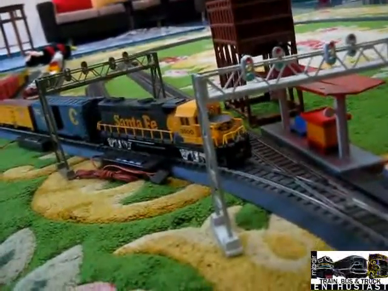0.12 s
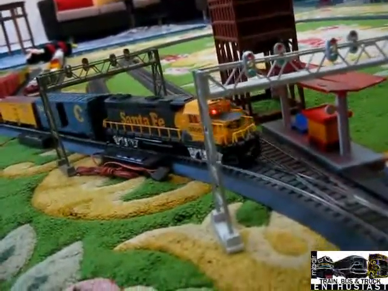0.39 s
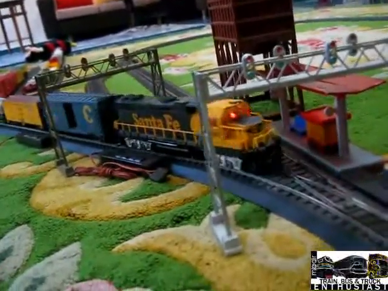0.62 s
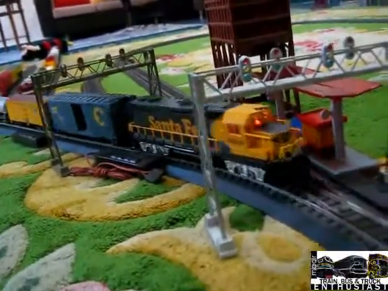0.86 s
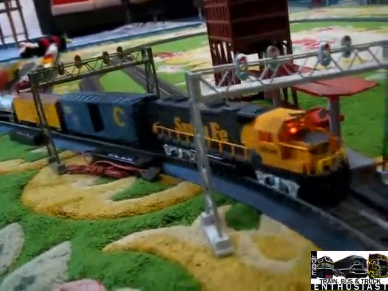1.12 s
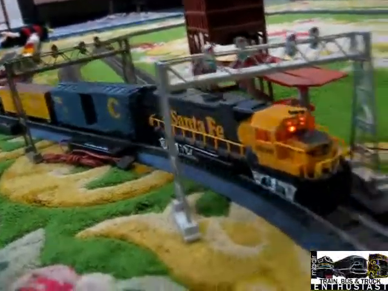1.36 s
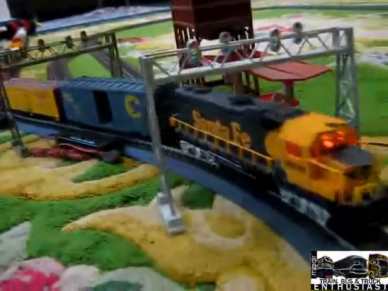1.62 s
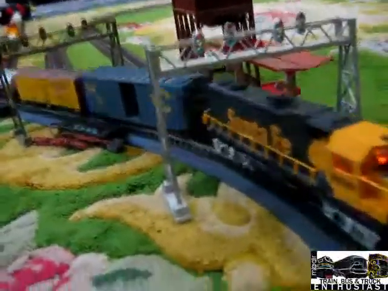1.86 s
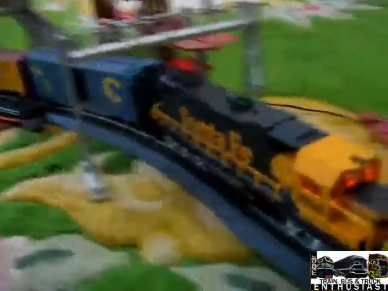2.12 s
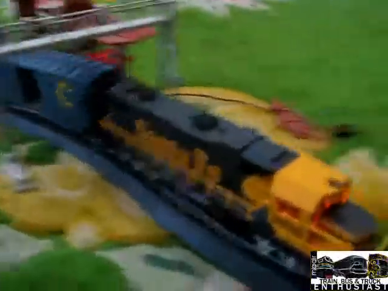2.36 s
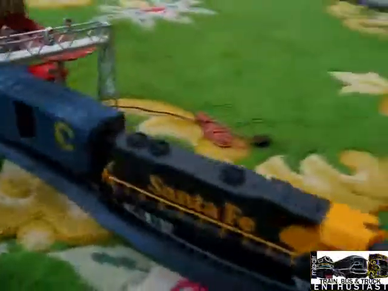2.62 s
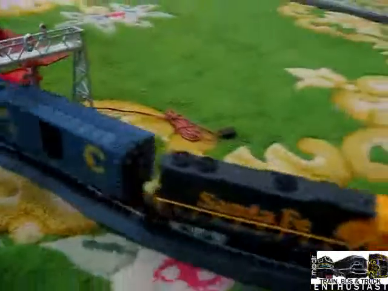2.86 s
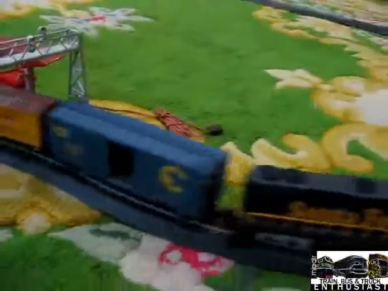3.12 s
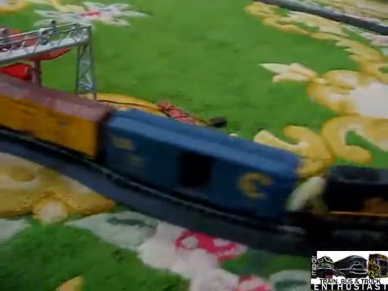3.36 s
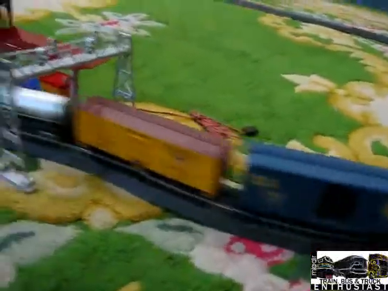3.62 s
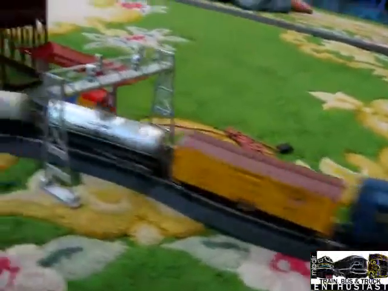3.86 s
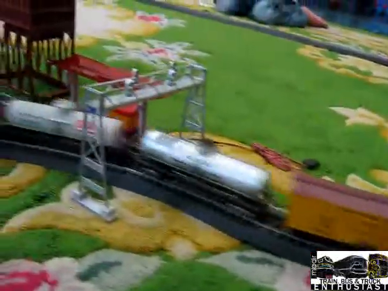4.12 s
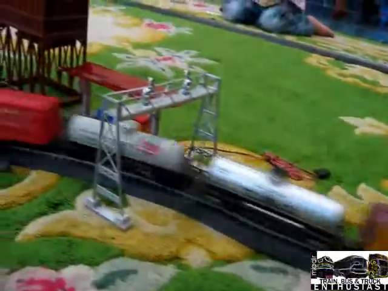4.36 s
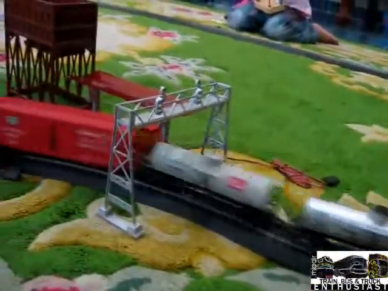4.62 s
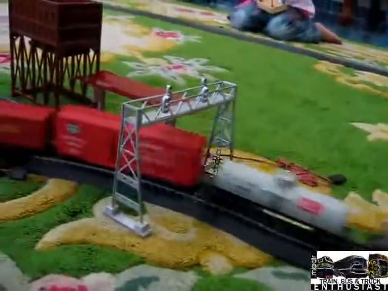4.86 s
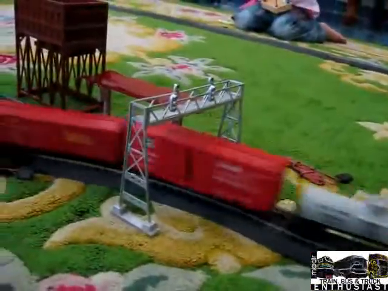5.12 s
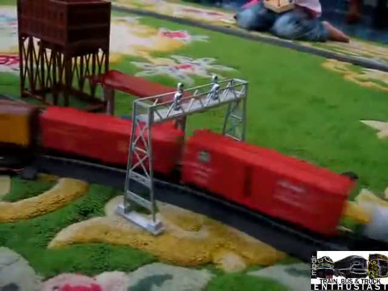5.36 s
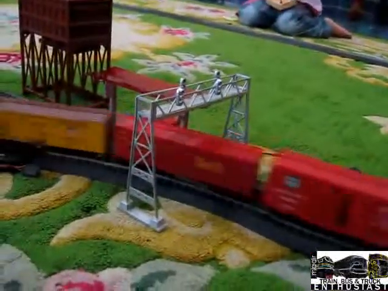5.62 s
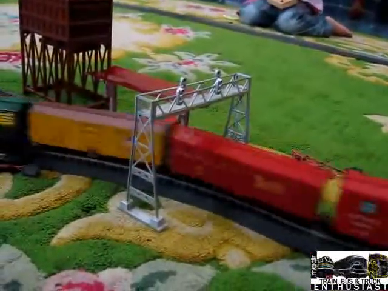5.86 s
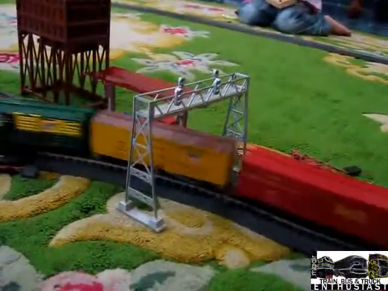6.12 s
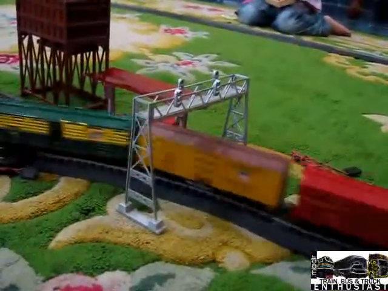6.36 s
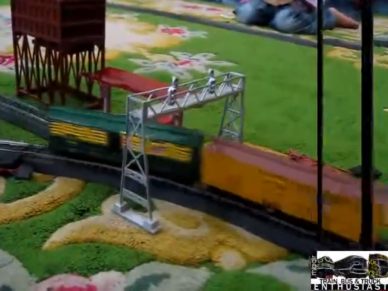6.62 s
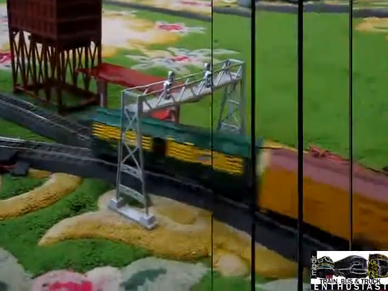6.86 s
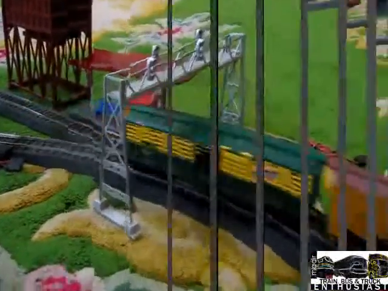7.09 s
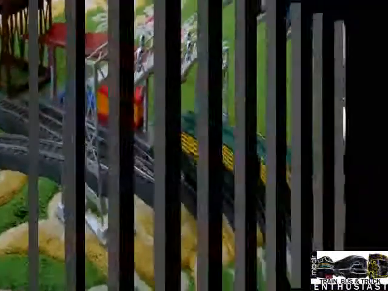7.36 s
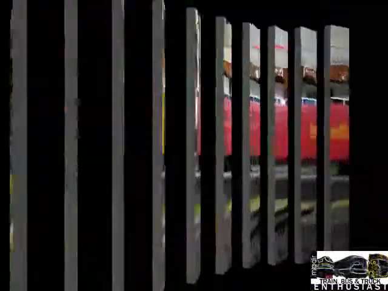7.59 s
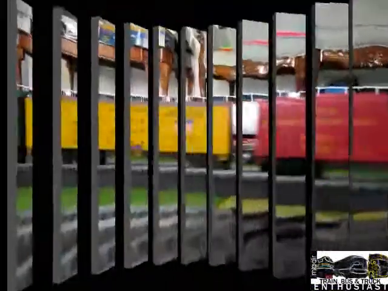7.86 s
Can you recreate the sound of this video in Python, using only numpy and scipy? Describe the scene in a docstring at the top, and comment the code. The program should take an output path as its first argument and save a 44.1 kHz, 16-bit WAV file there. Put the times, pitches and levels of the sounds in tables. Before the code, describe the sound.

Indoors, a quiet room hum comes first, with tiny rail ticks. A model locomotive starts, its thin gear whine climbing quickly while gritty hiss and electric fizz swell to a peak around two seconds. The whine wavers and sags as the wagons roll by with irregular clicks and dull little knocks. Near the end another train's whine and hiss swell in. Close, mono microphone.

```python
"""Over a steady room hum, wagons roll in quietly and tick over rail joints as a model locomotive pulls away.
Hiss and fizz (gritty shaped noise) swell, pulsing with the shafts; bands of noise sing for a while.
The gear whine (orders of the tooth mesh) climbs from 750 Hz, then wavers and sags; low knocks (short
decaying sines) make a small creak of the camera near 2.1 s, then dull thumps. Near the end a second
train's whine (upward-bending lines) swells in. All is mono, with a narrow gap near 8 kHz."""
import sys
import numpy as np
from scipy import signal
from scipy.fft import rfft, irfft, next_fast_len
from scipy.io import wavfile
from scipy.ndimage import uniform_filter1d, map_coordinates

SR = 44100
rng = np.random.default_rng(int(sys.argv[2]) if len(sys.argv) > 2 else 0)


def unload_wav(signal):
    """Save mono or channel-first audio to the path in sys.argv[1] as 16-bit WAV at rate SR, clipped to [-1, 1]."""
    wavfile.write(
        sys.argv[1],
        SR,
        np.round(np.clip(np.atleast_2d(signal).T, -1, 1) * 32767).astype(np.int16),
    )


def level_to_linear(level):
    """Convert decibel levels to linear amplitude factors, elementwise."""
    exponent = np.asarray(level, float) / 20
    return 10 ** exponent


N = 351918
HOP = 128  # samples between noise-shaping frames
GAP_HZ = 7875  # centre of the narrow gap in the spectrum

# room and preamplifier noise: f/Hz, relative level/dB
HUM_SPECTRUM = [(15, -30), (25, -12.5), (221, -7.5), (282, -7), (314, -6.5), (360, -7), (400, -9),
                (524, -10), (1080, -19), (1460, -17), (15600, -31)]
# wheels on rails: f/Hz, relative density/dB
ROLL_SPECTRUM = [(250, -51), (420, -9), (715, 2), (850, 0), (1290, 2), (1600, -2.5), (2080, 3),
                 (3520, -120)]
# wheels of the whole train: t/s, level/dB
ROLL_LEVEL = [(0, -55.5), (0.2, -55), (0.42, -51), (0.65, -45.5), (1.64, -44.5), (2.1, -42.5), (2.7, -40.5),
              (3.6, -41), (4.3, -43), (4.7, -41.5), (6.6, -44.5), (7.25, -44), (7.55, -40.5), (7.98, -43.5)]
# resonances of rails, roadbed and wagon shells: f/Hz, width/Hz, lift/dB
TRACK_RESONANCES = [(660, 110, 1.5), (1255, 730, 3), (1950, 410, -1), (2820, 160, 1.5), (3620, 770, 5),
                    (5000, 110, 0)]
# drive passing the microphone: t/s, gear hiss level/dB, brush fizz over hiss/dB, hiss resonance f/Hz
DRIVE_PASS = [(0.0, -61, -12, 3800), (0.2, -51.5, -6.5, 5000), (0.42, -43.5, -2.5, 5900),
              (0.7, -39.5, -2, 5550), (0.95, -37.5, 0.5, 5600), (1.26, -36.5, 2, 6230),
              (1.64, -31.5, -2.5, 5000), (2.09, -30, -7.5, 5110), (2.42, -31.5, -6, 4430),
              (2.69, -31.5, -6, 4964), (3.13, -32, -6, 4300), (3.53, -33, -7, 4113),
              (4.29, -38, -4.5, 4540), (4.75, -38.5, -6.5, 4000), (6.45, -42.5, -3.5, 3900),
              (6.62, -43, -4, 4500), (6.75, -40, -3, 4350), (7.27, -33.5, -4, 3900),
              (7.98, -33.5, -3.5, 3800)]
# gear hiss: f/Hz, relative density/dB
HISS_SPECTRUM = [(940, -46), (1600, 0.5), (2530, 4), (3000, 1.5), (3610, -1.5), (5560, 1.5), (7300, -1),
                 (9490, -23), (16100, -120)]
# brush fizz: f/Hz, relative density/dB
FIZZ_SPECTRUM = [(4940, -75), (8400, -0.5), (11200, -1), (12900, -1.5), (13900, -0.5), (15600, -6)]
# uneven shafts: mesh cycles per turn, depth in hiss (0-1), depth in fizz (0-1)
SHAFTS = [(60, .08, .14), (30, .12, .06), (10, .1, .1)]
# wheels over joints, couplers taking up slack: t/s, burst level before filters/dB, bright part re dull/dB
# (the dull part then gains 5.5 dB and the bright part loses 5 dB)
JOINT_TICKS = [(0.1905, -29.5, 0), (0.2138, -29, 6), (0.235, -29, 0), (0.2664, -34, -2), (0.2954, -30, 15),
               (0.3064, -32, 2), (0.3655, -40, -2), (0.398, -31, -2), (0.8674, -31, -2), (1.3644, -20, -2),
               (1.6797, -17, -2), (2.5477, -18, 0), (3.7562, -18, 1), (3.7809, -14, 0), (4.05, -28, -4),
               (4.1094, -21, -3), (4.1742, -19, -3), (4.331, -14, 4), (4.367, -17.5, 10),
               (4.4935, -19.5, 14), (4.571, -22, 20), (4.9531, -23, 12), (5.092, -19, 2), (5.1482, -14, 13),
               (5.2667, -20, 0), (5.3122, -18, -4), (5.34, -28, 0), (5.462, -19, -2), (5.5062, -18.5, 3),
               (5.5528, -19, 14), (5.7074, -24, -3), (6.3026, -26, -8), (6.3914, -20, -1), (6.7418, -27, 0),
               (7.6849, -19, 0), (7.7114, -15, 0), (7.7614, -25, -2)]
# bands that sing, at a guess resonating shells; the two rows near 3.4-3.7 kHz after 7.6 s are a rough order of
# the second train's whine: start/s, end/s, centre f/Hz, width/Hz, level/dB
SINGING_BANDS = [(0.357, 0.64, 5920, 830, -44), (0.54, 0.73, 332, 38, -54.5),
                 (0.556, 0.716, 5000, 520, -39), (0.724, 1.4, 3900, 379, -42.5),
                 (0.8, 1.4, 11400, 1000, -40), (1.17, 1.51, 6400, 300, -39.5), (1.5, 1.65, 14500, 720, -44),
                 (1.74, 1.9, 4800, 500, -30.5), (1.65, 2.45, 13400, 1400, -38), (1.1, 1.9, 9800, 600, -45),
                 (.9, 1.9, 8700, 900, -45), (1.901, 2.077, 4800, 500, -34), (1.999, 2.2, 172, 156, -53.5),
                 (2.051, 2.35, 5990, 386, -38), (2.38, 2.7, 3500, 310, -40.5), (2.4, 3.1, 14000, 1500, -39),
                 (2.9, 3.4, 13200, 1500, -42), (2.95, 3.6, 3500, 900, -37), (2.52, 2.945, 5700, 258, -39),
                 (3.002, 3.506, 4470, 250, -41.5), (5.651, 6.451, 1308, 80, -55),
                 (7.1, 7.454, 577, 120, -48.5), (4.552, 5.35, 11000, 980, -49),
                 (7.67, 7.86, 3400, 400, -36.5), (7.78, 8.15, 3700, 490, -36.5), (.84, 1.34, 700, 40, -48),
                 (1.45, 1.78, 780, 90, -51)]
# gear train: t/s, mesh f/Hz, base level/dB, strain gain per order above the first/dB
GEAR_MESH = [(0.38, 750, -68, 6.5), (0.49, 962, -49.5, 0.5), (0.6, 1230, -50, 0), (0.71, 1305, -46, -4),
             (0.8, 1273, -53, 3.5), (0.87, 1253, -53, 3.5), (0.93, 1365, -51, 4.5), (0.99, 1409, -48, 4.5),
             (1.11, 1590, -47, 2.5), (1.37, 1682, -49.5, 4), (1.42, 1752, -48, 3.5),
             (1.58, 1866, -47.5, 5.5), (1.78, 1915, -44, -2), (1.86, 1948, -42, 6), (1.9, 1860, -40, -5),
             (1.97, 1885, -41, 1), (2.14, 2047, -41.5, 1), (2.24, 2117, -44, 2.5), (2.39, 2154, -44, -3),
             (2.63, 2393, -40.5, -5), (2.71, 2447, -40.5, -4.5), (2.85, 2442, -43.5, -16),
             (3.1, 2479, -45, -14), (3.47, 2645, -45, -6), (3.88, 2605, -48.5, -3), (4.0, 2560, -55, -2),
             (4.32, 2560, -56, 1), (4.6, 2715, -55, -14), (4.8, 2690, -61, -10), (5.1, 2770, -52, -15),
             (5.5, 2685, -61, -12), (6.0, 2595, -52, -3), (6.6, 2516, -56, -3)]
# mesh orders: multiple of mesh f, roughness (0-1), skirt re line/dB
MESH_ORDERS = [(.5, .6, -5), (1, .14, -12), (2, .25, -7), (3, .3, -6), (4, .4, -4)]
# gain of each mesh order: gain/dB
MESH_ORDER_DB = [-14, -1.5, -7, -10, -9.5]
# locomotive shell resonances: f/Hz, width/Hz, lift/dB
SHELL_RESONANCES = [(800, 230, 15), (1223, 130, 7), (1886, 120, 5), (2490, 330, 5.5), (3800, 450, 6),
                    (4270, 200, 5.5), (5170, 700, 8), (6500, 600, 3.5)]
# orders that ring out briefly: multiple of mesh f, start/s, end/s, lift/dB
RINGING_ORDERS = [(.5, 1.04, 1.3, 8), (1, 0.53, .8, 3), (1, 1.05, 1.47, 2), (1, 1.98, 2.62, 3.5),
                  (1, 3.2, 3.5, 5), (1, 4.95, 5.25, 12.5), (2, 0.493, 0.774, 14), (2, .92, 1.1, 6.5),
                  (2, 1.34, 1.89, 12), (2, 2.08, 2.37, 8.5), (2, 2.56, 2.88, 15.5), (2, 3.62, 4.4, 9.5),
                  (3, .75, .94, 13.5), (3, 1.05, 1.34, 10.5), (3, 1.33, 1.68, 13), (4, 0.7, 0.928, 13),
                  (4, 0.89, 1.46, 10.5)]
# low knocks, a small creak of the camera near 2.1 s, then dull thumps:
# t/s, level before attack and decay/dB, f/Hz
LOW_KNOCKS = [(2.044, -31, 360), (2.076, -28.5, 370.5), (2.119, -32, 368), (2.169, -31.5, 380),
              (3.419, -27.5, 703), (3.551, -24.5, 701), (3.872, -30.5, 653.4), (5.785, -32, 678),
              (7.277, -28, 619.5), (7.493, -21.5, 656), (7.558, -27.5, 632), (7.685, -27, 637),
              (7.752, -25.5, 657), (7.951, -24, 651)]
# whine of the second train: start/s, end/s, start f/Hz, end f/Hz, level at 70 % of the span/dB
SECOND_LINES = [(6.661, 7.64, 4168, 4450, -40), (6.8, 8.1, 1985, 2008, -48), (6.85, 7.5, 1792, 1806, -50),
                (7.68, 8.2, 4680, 4900, -44.5)]


def unit(x):
    """Scale to rms 1."""
    return x / np.sqrt(np.mean(x ** 2) + 1e-20)


def along(points, hz):
    """Interpolate (f/Hz, value) points on a log frequency axis."""
    f, v = np.transpose(points)
    return np.interp(np.log(hz + 1), np.log(f + 1), v)


def curves(rows):
    """One value per sample for each column after the time."""
    s, *columns = np.transpose(rows)
    return [np.interp(np.arange(N) / SR, s, c) for c in columns]


def wobble(knots_per_s):
    """Smooth random curve through normally distributed knots."""
    knots = rng.standard_normal(int(N * knots_per_s / SR) + 4)
    return map_coordinates(knots, [np.arange(N) * knots_per_s / SR])


def swell(start_s, end_s, edge):
    """Progress 0-1 through a span, and a level that fades over the share edge at each side."""
    u = np.clip((np.arange(N) / SR - start_s) / (end_s - start_s), 0, 1)
    return u, np.sin(np.pi / 2 * np.clip(np.minimum(u, 1 - u) / edge, 0, 1)) ** 2


def filtered(x, response):
    """Apply a zero-phase response, given as a function of frequency."""
    m = next_fast_len(N + 8192)
    return irfft(rfft(x, m) * response(np.fft.rfftfreq(m, 1 / SR)), m)[:N]


def resonances_db(rows, hz):
    """Sum of resonance lifts at a frequency."""
    return sum(db / (1 + (2 * (hz - centre) / width) ** 2) for centre, width, db in rows)


def rattle(spectrum, grit_db, patchy_db, peak_hz, width, lift_db):
    """Gritty, patchy noise levelled to rms 1 over 0.2 s, with one resonance (width in log frequency)."""
    grit = rng.standard_normal(N) * level_to_linear(grit_db)
    hz, t, z = signal.stft(grit, SR, nperseg=4 * HOP, noverlap=3 * HOP)
    patches = uniform_filter1d(rng.standard_normal(z.shape), size=8, axis=0)
    patches = uniform_filter1d(patches, size=15, axis=1)
    # narrow resonances that linger
    streaks = uniform_filter1d(rng.standard_normal(z.shape), size=120, axis=1)
    frame = np.minimum(np.arange(len(t)) * HOP, N - 1)
    offset = np.log((hz[:, None] + 1) / peak_hz[frame]) / width
    peak_db = lift_db[frame] * np.exp(-offset ** 2)
    z = z * level_to_linear(patchy_db * unit(patches) + 2.16 * unit(streaks) + peak_db)
    x = signal.istft(z, SR, nperseg=4 * HOP, noverlap=3 * HOP)[1][:N]
    x = filtered(x, lambda f: level_to_linear(along(spectrum, f) + resonances_db(TRACK_RESONANCES, f)))
    power = uniform_filter1d(uniform_filter1d(x * x, size=SR // 5), size=SR // 5)
    return x / np.sqrt(np.abs(power) + 1e-20)


def tone(cycles, rough, spread_hz, skirt_hz, skirt_db):
    """Line of rms 1, a sine blended with narrow noise, plus a wider skirt of noisy sidebands."""
    rough = np.clip(rough, 0, 1)

    def fuzz(width_hz):
        return unit(wobble(width_hz)) + 1j * unit(wobble(width_hz))

    swing = np.sqrt(2 - 2 * rough) + np.sqrt(rough) * fuzz(spread_hz)
    swing = swing + level_to_linear(skirt_db) * fuzz(skirt_hz)
    return np.real(swing * np.exp(2j * np.pi * cycles))


def mesh_cycles():
    """Tooth-mesh cycle count: the mesh frequency, slightly unsteady, summed over time."""
    mesh_hz = curves(GEAR_MESH)[0]
    return np.cumsum(mesh_hz * (1 + 0.00198 * wobble(25))) / SR


def shaft_turns(cycles):
    """One cosine per shaft, a cycle each turn, with wandering phase."""
    return [np.cos(2 * np.pi * cycles / n + 1.66 * wobble(8.7)) for n, _, _ in SHAFTS]


def hum():
    """Steady room and preamplifier noise: shaped white noise."""
    noise = filtered(rng.standard_normal(N), lambda f: level_to_linear(along(HUM_SPECTRUM, f)))
    return level_to_linear(-53.5) * unit(noise)


def rolling(shake):
    """Wheels on rails: low gritty noise, shaken by bumps in the track."""
    level_db, = curves(ROLL_LEVEL)
    still = np.ones(N)
    noise = rattle(ROLL_SPECTRUM, grit_db=1.36 * wobble(300), patchy_db=0.5,
                   peak_hz=still, width=1, lift_db=0 * still)
    return level_to_linear(level_db + 0.59 * shake) * noise


def gear_hiss(turns, shake, grit):
    """Tooth contacts: noise with a moving resonance, pulsed by uneven shafts."""
    level_db, _, peak_hz = curves(DRIVE_PASS)
    beat = 1 + sum(depth * turn for (_, depth, _), turn in zip(SHAFTS, turns))
    lift_db = 5.5 + 9 * np.log2(peak_hz / 4000)  # stands out more the higher it sits
    noise = rattle(HISS_SPECTRUM, grit_db=0.51 * grit, patchy_db=1.18,
                   peak_hz=peak_hz, width=0.44, lift_db=lift_db)
    return level_to_linear(level_db + 0.46 * shake) * beat * noise


def brush_fizz(turns, shake, grit):
    """Brush contacts: treble noise peaking at a fixed resonance, pulsed by uneven shafts."""
    hiss_db, over_db, _ = curves(DRIVE_PASS)
    beat = 1 + sum(depth * turn for (_, _, depth), turn in zip(SHAFTS, turns))
    still = np.ones(N)
    noise = rattle(FIZZ_SPECTRUM, grit_db=1.4 * grit, patchy_db=1.8,
                   peak_hz=11500 * still, width=.085, lift_db=3 * still)
    return level_to_linear(hiss_db + over_db + 0.19 * shake) * beat * noise


def ticks():
    """Noise bursts of a few ms, a dull and a bright part; faint ones fall at random, following the hiss."""
    t = np.arange(SR // 40) / SR
    dull, bright = np.zeros(N + len(t)), np.zeros(N + len(t))
    hiss_db = curves(DRIVE_PASS)[0]
    draws = rng.random((90, 2)) * [N / SR, 1]
    faint = [(s, hiss_db[int(s * SR)] + 5 + 3 * extra, -6) for s, extra in draws]
    for s, db, bright_db in list(JOINT_TICKS) + faint:
        shape = level_to_linear(db - 60 * t / 0.011) * (1 - np.exp(-t / 0.001))  # -60 dB in 11 ms, 1 ms attack
        at = round(s * SR)
        dull[at:][:len(t)] += level_to_linear(5.5) * shape * rng.standard_normal(len(t))
        bright[at:][:len(t)] += level_to_linear(bright_db - 5) * shape * rng.standard_normal(len(t))

    def band(lo_hz, hi_hz):
        return lambda f: (f / lo_hz) ** 2 / (1 + (f / lo_hz) ** 2) / (1 + (f / hi_hz) ** 4)

    dull = filtered(dull[:N], band(lo_hz=900, hi_hz=6960))
    return dull + filtered(bright[:N], band(lo_hz=10500, hi_hz=14700))


def singing(turn):
    """Narrow noise bands swell and fade, pulsed by a shaft; those below the gap climb in pitch."""
    out = np.zeros(N)
    for start_s, end_s, hz, width_hz, db in SINGING_BANDS:
        u, level = swell(start_s, end_s, edge=0.37)
        span_s = end_s - start_s
        knots = rng.standard_normal((2, 4000))
        i, q = (map_coordinates(k, [u * span_s * width_hz]) for k in knots)
        rise = .08 * (hz < GAP_HZ) * span_s * (u - .5)  # 8 % of the centre per second
        carrier = np.exp(2j * np.pi * np.cumsum(hz * (1 + rise)) / SR)
        out += level_to_linear(db) * level * np.real((i + 1j * q) * carrier)
    return (1 + 0.19 * turn) * out


def shell_db(hz):
    """Shell resonances over a -4 dB floor; lines fade below 900 Hz and stop near 7 kHz, under the gap."""
    rolloff_db = 10 * np.log10((1 + (900 / hz) ** 4) * (1 + (hz / 6950) ** 40))
    return -4 + resonances_db(SHELL_RESONANCES, hz) - rolloff_db


def ringing_db(k):
    """Brief lifts of mesh order k."""
    return sum(db * swell(start_s, end_s, edge=.2)[1]
               for order, start_s, end_s, db in RINGING_ORDERS if round(2 * order) == 2 * k)


def gear_whine(cycles):
    """Gear mesh orders, each lifted as it sweeps through the shell resonances."""
    mesh_hz, base_db, strain_db = curves(GEAR_MESH)
    lines = np.zeros(N)
    for (k, rough, skirt_db), order_db in zip(MESH_ORDERS, MESH_ORDER_DB):
        db = base_db + order_db + strain_db * max(k - 1, 0)
        db = db + shell_db(k * mesh_hz) + ringing_db(k) + 2.2 * wobble(12)
        lines += level_to_linear(db) * tone(k * cycles, rough, spread_hz=70 * k + 40,
                                skirt_hz=220 * k, skirt_db=skirt_db)
    runout = 1 + 0.18 * np.cos(2 * np.pi * cycles / SHAFTS[1][0])  # off-centre gear splits each line
    sample = np.arange(N)
    heard = (sample > GEAR_MESH[0][0] * SR) & (sample < GEAR_MESH[-1][0] * SR)
    return heard * runout * lines


def knocks():
    """Low knocks: short decaying sines with a soft attack."""
    t = np.arange(SR // 8) / SR
    out = np.zeros(N + len(t))
    for s, db, hz in LOW_KNOCKS:
        shape = level_to_linear(db - 60 * t / 0.05) * (1 - np.exp(-t / 0.0046))  # -60 dB in 50 ms, 4.6 ms attack
        out[round(s * SR):][:len(t)] += shape * np.sin(2 * np.pi * hz * t)
    return out[:N]


def second_whine():
    """Gear lines of the second train grow, bend upward late in their spans and fade."""
    out = np.zeros(N)
    for start_s, end_s, hz0, hz1, db in SECOND_LINES:
        u, level = swell(start_s, end_s, edge=0.17)
        hz = (hz0 + (hz1 - hz0) * u ** 5) * (1 + .004 * wobble(9))
        line = tone(np.cumsum(hz) / SR, rough=0.24, spread_hz=.018 * hz0, skirt_hz=.12 * hz0, skirt_db=-9)
        out += level * level_to_linear(db + 6 * (u - .7) + 1.5 * wobble(14)) * line
    return out


def scene():
    """All sources reach one microphone."""
    cycles = mesh_cycles()
    turns = shaft_turns(cycles)
    shake = wobble(30)  # track bumps shake rolling, hiss and fizz together
    grit = wobble(300)  # tooth and brush contacts roughen hiss and fizz together
    mono = hum() + rolling(shake) + gear_hiss(turns, shake, grit) + brush_fizz(turns, shake, grit)
    mono = mono + ticks() + singing(turns[1]) + gear_whine(cycles) + knocks() + second_whine()
    return np.array([mono, mono])


def top_cut(x):
    """Nothing passes above the cut-off."""
    return signal.sosfilt(signal.butter(12, 17060, fs=SR, output="sos"), x)


def record(dry):
    """Band limits of the mono sound: a narrow gap near 8 kHz, nothing above 15.8 kHz."""
    def response(f):
        offset_hz = f - GAP_HZ
        return np.abs(offset_hz) / np.sqrt(offset_hz ** 2 + 450 ** 2) * (f < 15800)

    mono = filtered(dry[0], response)
    return top_cut(np.array([mono, mono]))


dry = scene()
out = record(dry)
unload_wav(out)
```